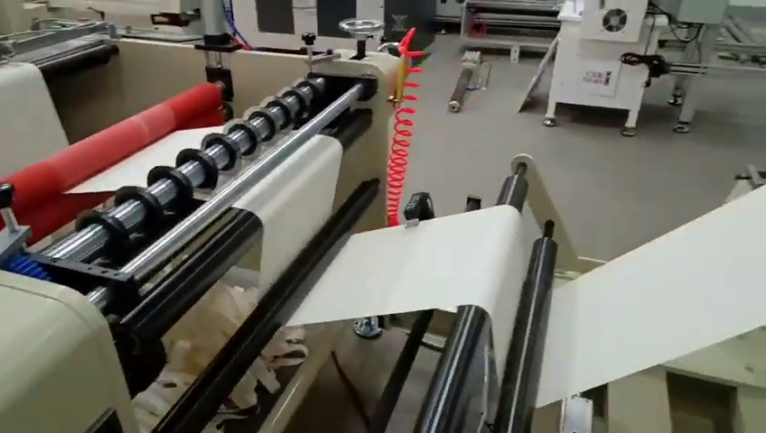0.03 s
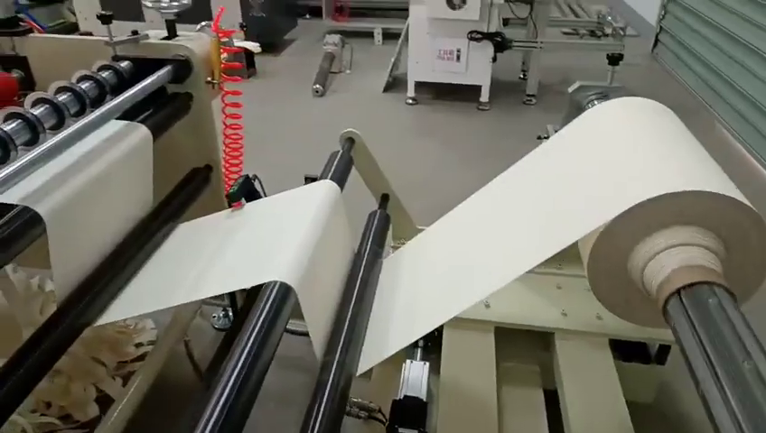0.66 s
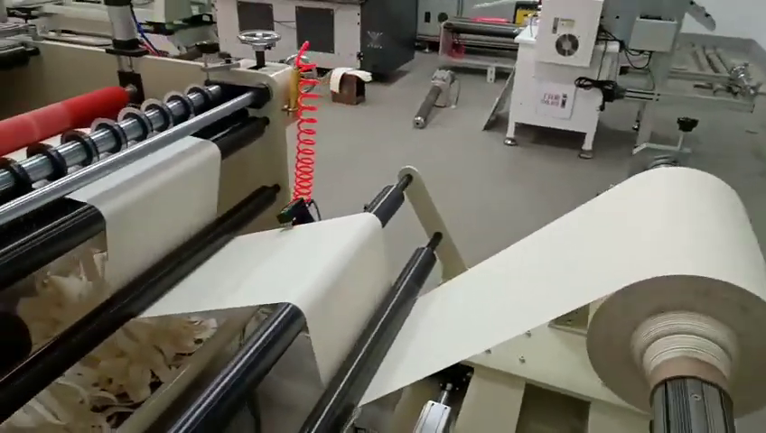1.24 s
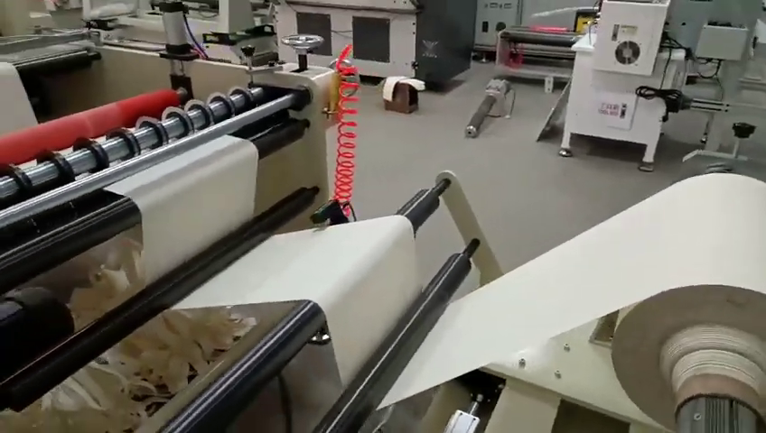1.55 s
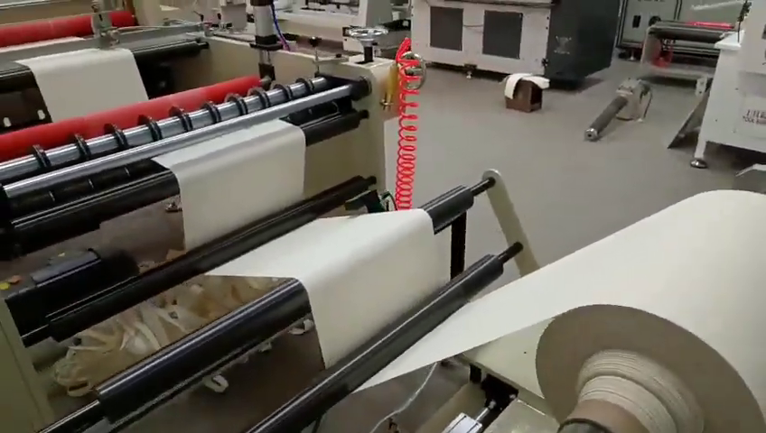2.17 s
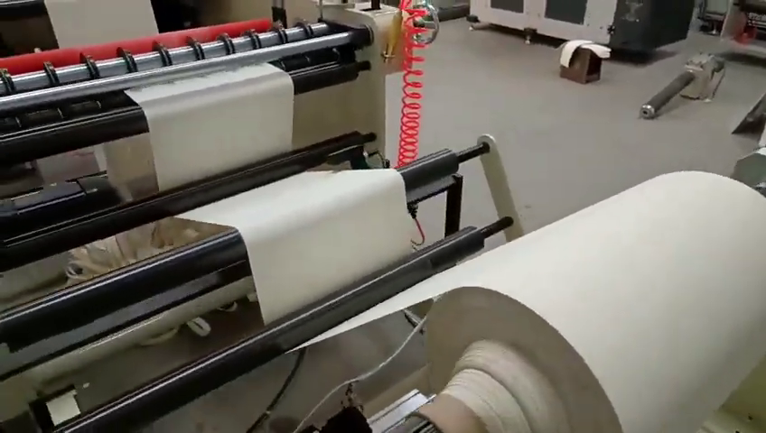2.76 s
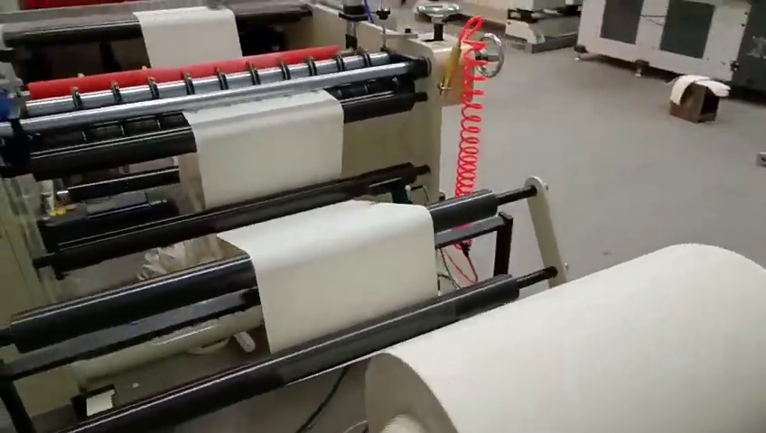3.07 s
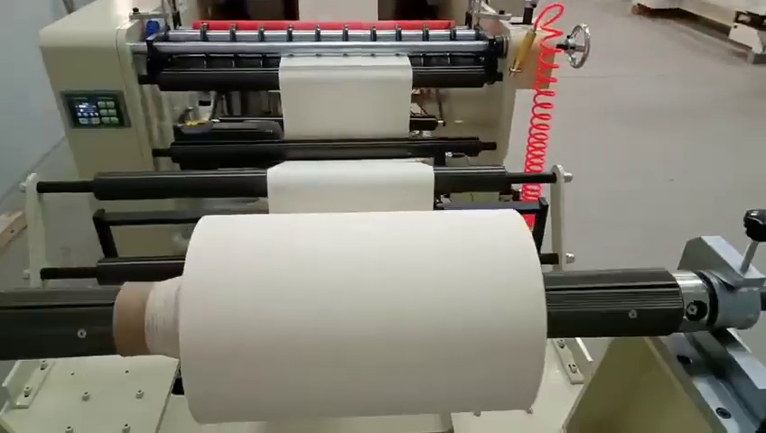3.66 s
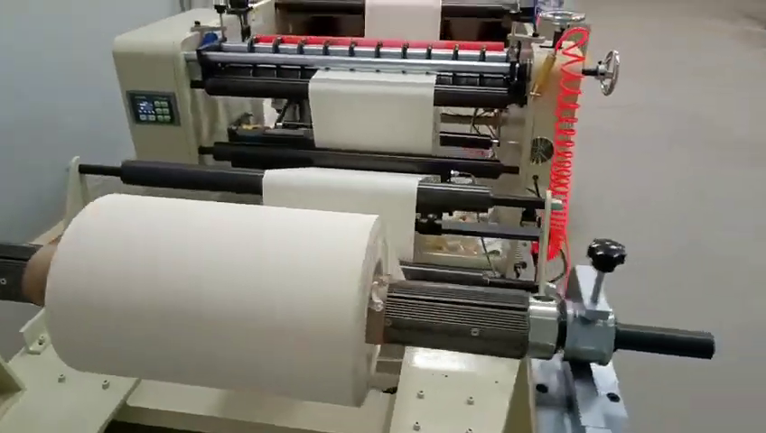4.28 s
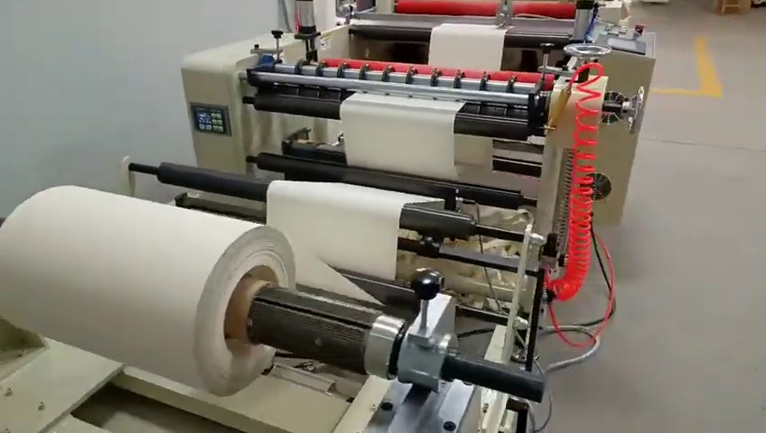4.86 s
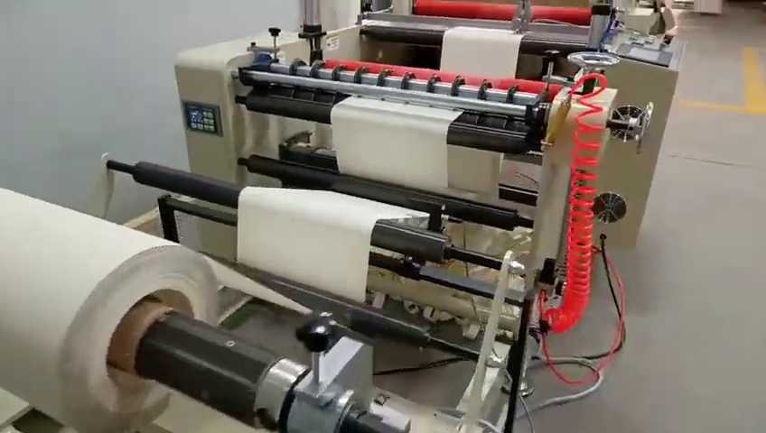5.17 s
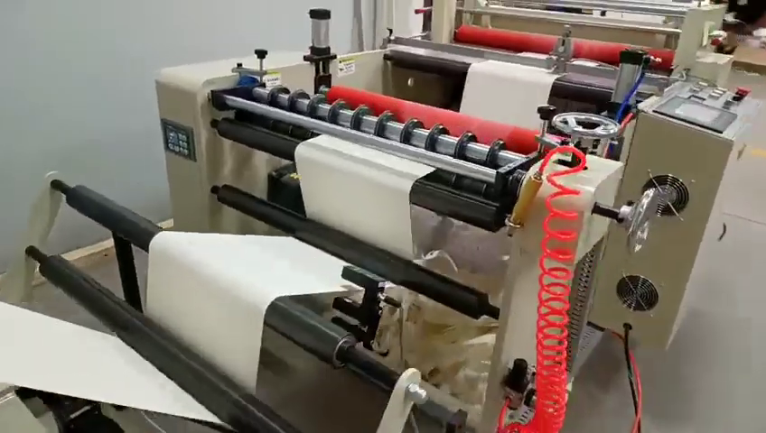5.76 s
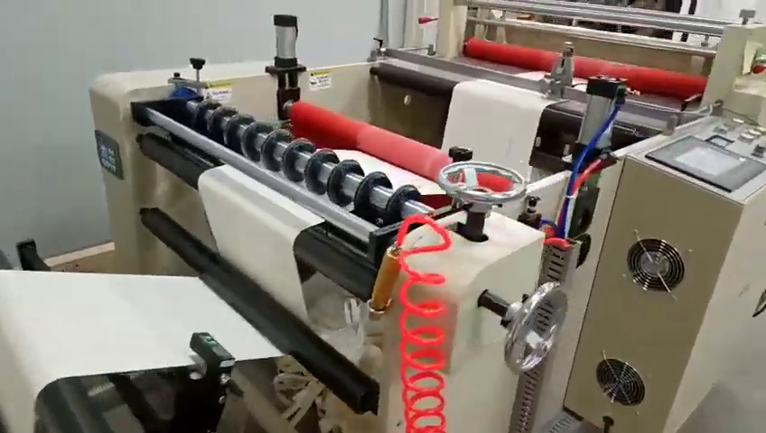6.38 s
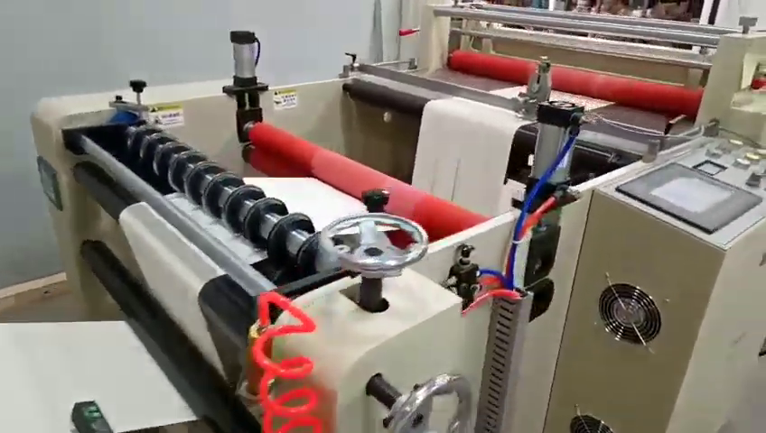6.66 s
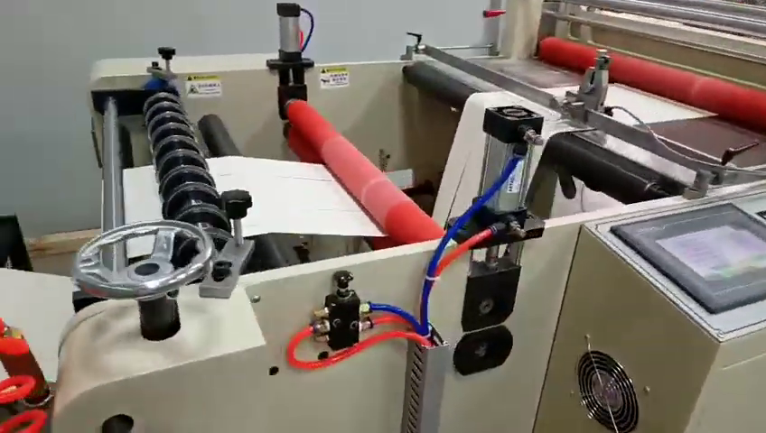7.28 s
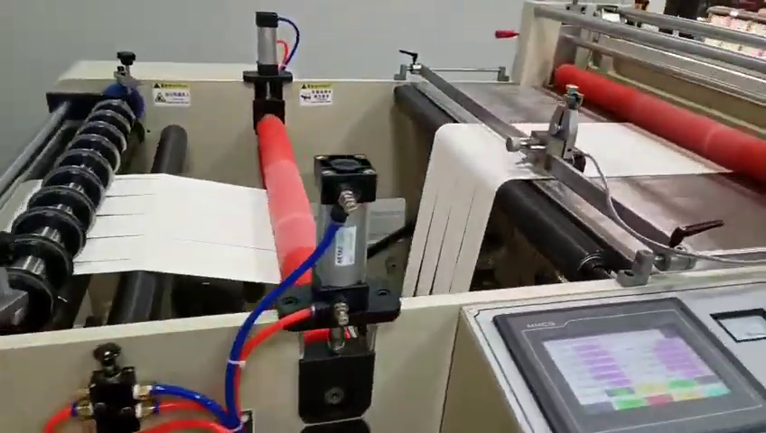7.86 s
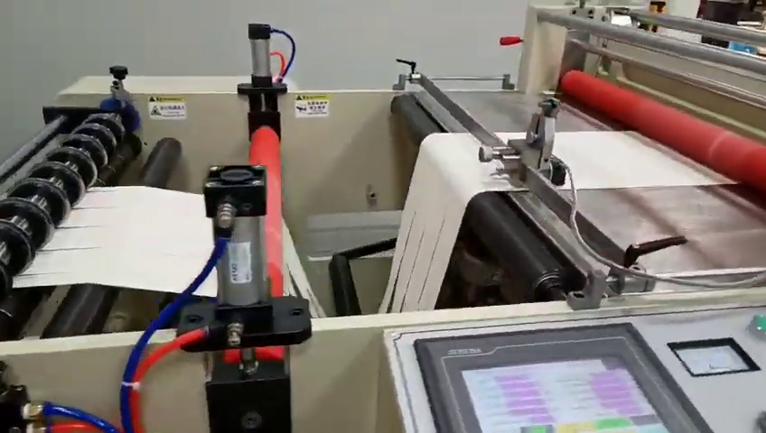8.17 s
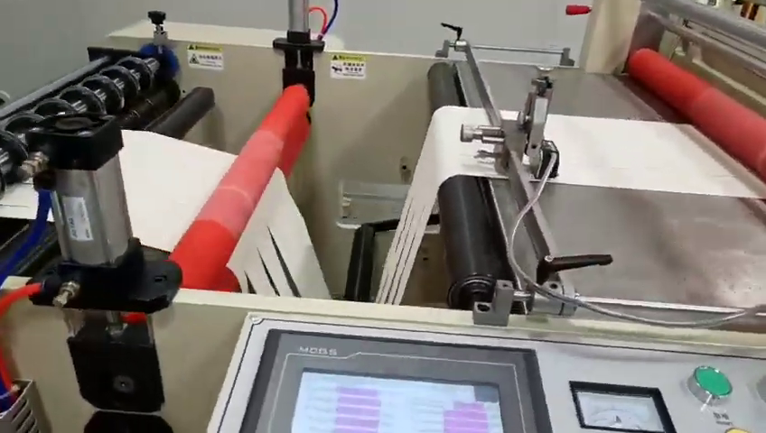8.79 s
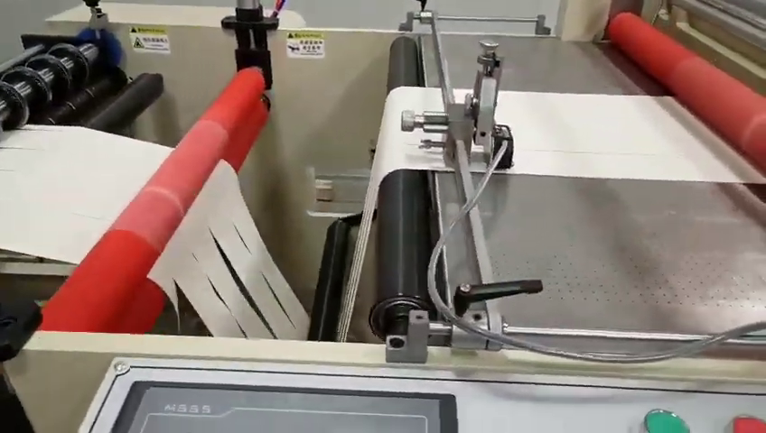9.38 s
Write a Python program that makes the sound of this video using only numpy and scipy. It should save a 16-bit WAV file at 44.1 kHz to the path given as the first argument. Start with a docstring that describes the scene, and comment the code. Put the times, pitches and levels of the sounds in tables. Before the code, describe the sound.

Sharp metallic clunks from a paper machine's knife land a little over a second apart, each ringing briefly in an echoing workshop. Between them the feed swells and stops, with roller rumble, sliding paper hiss, a high motor whistle and a clacking thud. Fan noise and hum fill the gaps. Heard from close by while walking around the machine, it all grows somewhat softer near the end.

```python
"""The knife of a paper sheeting machine clashes down every 1.3 s in a hard-walled workshop.
Before each cut a servo pulls the web forward: rollers rumble and sing, paper hisses over the
guides, the drive whines, then the feed brakes with a thud. Fans and hum fill the pauses.
The drive's whistle and the fans change level as the listener walks round the machine."""
import sys
import numpy as np
from scipy import signal
from scipy.fft import rfft, irfft
from scipy.io import wavfile
from scipy.ndimage import uniform_filter1d

SR = 44100
rng = np.random.default_rng(int(sys.argv[2]) if len(sys.argv) > 2 else 0)


def generate_wav(sig):
    """Save sig (samples, or channels by samples) to the path in sys.argv[1] as 16-bit PCM at SR."""
    pcm = np.round(np.clip(np.atleast_2d(sig).T, -1, 1) * 32767).astype(np.int16)
    wavfile.write(sys.argv[1], SR, pcm)


N = 424683
TIME = np.arange(N) / SR
CYCLE_S, RING_SAMPLES = 1.3, 2 ** 16

# Each row: start in seconds, delay to the snap in seconds, level, bass, treble, hall tail and
# blade ring in dB, tail length factor, two longest-ringing modes in Hz.
CUTS = [(-.03, .015, -23.5, 0, 0, 1, 0, 1, 1480, 1040),
        (1.268, .0135, -23.5, -1, 2.5, 1, 0, 1.15, 2203, 1746),
        (2.565, .023, -22.5, 1, 2, .5, 1, 1.2, 1040, 795),
        (3.865, .024, -22.2, 1, 1, .5, 0, 1.15, 935, 2203),
        (5.169, .024, -20.7, 1, .7, -1.5, 1, 1.05, 1480, 1165),
        (6.468, .0135, -21, 0, -2, -1, 0, .9, 1990, 1235),
        (7.765, .0145, -22, -3, -8.5, -1, 3, .88, 1746, 795),
        (9.065, .0145, -24.5, -6, -10, -1, 3, .9, 1746, 1480)]
# Touch, snap, two rebounds. Each row: time from the snap in seconds, level in dB.
BLADE_CONTACTS = [(-.0095, -15), (0, -10), (.0045, -13.5), (.0165, -15)]
# Each row: frequency in Hz, width in Hz, gain in dB.
KNIFE_MODES = [(795, 20, -1), (935, 24, 1), (1040, 24, -4), (1118, 20, -3), (1165, 20, -12),
               (1235, 24, -10), (1480, 20, 1), (1746, 22, 0), (1990, 24, -13), (2203, 34, -2),
               (2736, 20, -4), (3420, 40, -5)]
FRAME_MODES = [(93.7, 8.8, 2.5), (103.7, 21, -10), (135.5, 12, -0.5), (177.5, 9, 1), (270, 14.8, -1.5),
               (359, 5.3, -13.5)]
# Each row: frequency in Hz, gain in dB.
CLASH_SPECTRUM = [(60, -18.5), (130, -6), (260, 2.5), (400, -3), (680, -3), (900, 3), (1600, 3), (2300, 0),
                  (3200, -6.5), (5500, -11.5), (8000, -17.5), (14000, -21)]
def knife():
    """The blade touches, snaps through and rebounds on its anvil, ringing itself and the frame."""
    long_ring_db, long_t60_s = -15, .7
    out = np.zeros(N)
    s = TIME[:RING_SAMPLES]
    for at, snap_s, db, bass_db, treble_db, hall_db, ring_db, stretch, *long_hz in CUTS:
        shear = chatter(peak_s=snap_s, fade_s=.017, per_s=1500, grit=.55)
        shear /= np.linalg.norm(shear)
        for after_s, contact_db in BLADE_CONTACTS:
            add(shear, amp([contact_db]), snap_s + after_s)
        blow = hall(shear, hall_db, stretch)
        ring = amp(ring_db) * resonate(blow, struck(KNIFE_MODES))
        steel = colour(blow + ring + resonate(blow, FRAME_MODES), CLASH_SPECTRUM)
        tilt = [(900, bass_db), (1500, 0), (1800, 0), (2400, treble_db / 6), (4500, treble_db)]
        add(out, amp(db) * unit(colour(steel, tilt), size=2048), at)
        fade = amp(db + long_ring_db - 60 * s / long_t60_s)
        for hz in long_hz:
            add(out, fade * tone(2 * np.pi * hz * s, scatter=.6, rate_hz=35), at + snap_s)
    return out


# Each row: start in seconds, thud level in dB, clack level in dB, clack treble in dB.
LINKAGE_KNOCKS = [(-.18, -23, -34, 0), (.925, -42, -41, 0), (1.034, -34, -37.5, -6),
                  (1.116, -25.5, -31.5, 3), (2.203, -35, -36.5, 1), (2.268, -38, -41, 0),
                  (2.415, -21, -33, 4), (3.612, -33, -41, 0), (3.716, -25.5, -34.5, 1),
                  (5.015, -25.5, -33, 0), (6.317, -26.5, -29, -4), (7.43, -32, -52, -4),
                  (7.622, -30, -41, -5), (7.68, -36, -40, -5), (8.858, -42, -46, -2),
                  (8.918, -29.5, -34.3, -6), (8.975, -32.5, -43, -2)]
# Each row: frequency in Hz, width in Hz, gain in dB.
LINKAGE_MODES = [(935, 30, 0), (1130, 40, 1), (1290, 40, 0), (1700, 45, 0), (1930, 70, 0), (2580, 90, -1),
                 (2736, 25, -1), (3360, 35, -1)]
# Each row: frequency in Hz, gain in dB.
THUD_SPECTRUM = [(40, -53), (70, -10), (90, -1), (140, 1.5), (190, -7.5), (300, -1), (480, -9), (650, -22),
                 (900, -44.5)]
CLACK_SPECTRUM = [(100, -4.5), (500, 8), (1100, 5), (2000, 2), (3200, -3), (4200, -6), (7000, -42),
                  (14000, -51)]
def linkage():
    """The feed linkage clacks and the heavy frame shudders, hardest on braking."""
    out = np.zeros(N)
    push = signal.unit_impulse(RING_SAMPLES, int(.01187 * SR))
    boom = unit(resonate(colour(push, THUD_SPECTRUM), FRAME_MODES), size=4096)
    for at, thud_db, clack_db, treble_db in LINKAGE_KNOCKS:
        jolt = chatter(peak_s=.032, fade_s=.05, per_s=280, grit=1)
        jolt = colour(hall(jolt, wet_db=-2.5), THUD_SPECTRUM)
        shudder = unit(jolt + amp(2.5) * resonate(jolt, FRAME_MODES), size=4096)
        thud = amp(-3) * shudder + amp(-11.5) * boom
        clack = chatter(peak_s=.009, fade_s=.022, per_s=400, grit=1.2)
        clack = colour(hall(clack, wet_db=-1), CLACK_SPECTRUM)
        clack += 2 * resonate(clack, struck(LINKAGE_MODES))
        clack = colour(clack, [(1200, 0), (2800, treble_db)])
        add(out, amp(thud_db) * thud + amp(clack_db) * unit(clack, size=2048), at)
    return out


# Each row: start in seconds, rumble in dB, its growth in dB/s, its steepness factor, drone, hiss,
# fizz and sheen in dB, growth of fizz and sheen in dB/s, howl and rattle in dB.
PULLS = [(-.89, -35.5, 0, 1, -39, -42, -51, -58, 0, -48, -49),
         (.41, -32.5, -7, 1, -38, -39, -45.5, -47, 0, -37.5, -50),
         (1.708, -31, -3, .9, -38, -40.3, -45, -48, -3, -38, -48),
         (3.007, -31.5, 0, .9, -36.5, -41.3, -49.5, -58.5, -8, -50, -46),
         (4.309, -32, -2, 1.1, -35.5, -42, -49, -55, -2, -52, -46.5),
         (5.608, -32, -1, 1.3, -37.5, -41.7, -45.3, -52.5, -17, -52, -49),
         (6.909, -38, -8, 1.7, -42, -47.5, -53.5, -61, -3, -54, -59),
         (8.205, -36, -10, 1.7, -44, -49, -45.5, -51.5, -11, -51, -57),
         (9.507, -38, 0, 1.7, -44, -48, -46, -54, 0, -52, -58)]
# Each row: frequency in Hz, width in Hz, gain in dB.
ROLLER_MODES = [(209, 88, -4.5), (269.5, 30, -1), (335.6, 8, 8), (376.5, 10, 2), (415, 80, 1),
                (528, 13, -1)]
HOWL_MODES = [(556, 45, -1), (602, 36, 0)]
# Each row: frequency in Hz, gain in dB.
RUMBLE_SPECTRUM = [(100, -23), (180, -4.5), (300, -2.5), (450, -1), (620, -5), (760, -11.5), (1000, -23),
                   (2000, -28.5), (3500, -30), (8000, -59)]
RATTLE_SPECTRUM = [(400, -22), (900, -2), (1500, 0), (2300, -1), (3200, -11), (7000, -25)]
HISS_SPECTRUM = [(600, -14), (1000, -1.5), (2200, -.5), (3200, -6.3), (4250, 6), (4750, 3.5), (5600, 6),
                 (7500, -2.5), (10000, -14), (14000, -22)]
FIZZ_SPECTRUM = [(4500, -28), (6600, 1), (8200, 1.5), (9700, 1), (10700, -6), (14000, -19)]
SHEEN_SPECTRUM = [(7000, -30), (10000, -1), (11000, -2), (12000, -1.5), (14000, -2)]
def feed():
    """Rollers tumble on their bearings, howl and shake linkage and frame; the web slides over guides."""
    (_, rumble_db, rumble_db_per_s, steepness, drone_db, hiss_db,
     fizz_db, sheen_db, fizz_db_per_s, howl_db, rattle_db) = np.transpose(PULLS)
    knocks = colour(unit(grains(per_s=1500, spread_db=2.5)) + .64 * noise(), RUMBLE_SPECTRUM)
    rumble = unit(knocks + amp(2) * resonate(knocks, ROLLER_MODES)) * amp(.9 * walk(22))
    out = rumble * swell(rumble_db, 2.4 * steepness, lag_s=-.035, rest_db=-26, db_per_s=rumble_db_per_s)

    howl = unit(resonate(resonate(grains(per_s=600, spread_db=2), HOWL_MODES), HOWL_MODES))
    out += howl * swell(howl_db, power=2, lag_s=-.11, rest_db=-30)

    ticks = unit(grains(per_s=260, spread_db=1.5)) + .5 * noise()
    rattle = unit(colour(ticks + 2 * resonate(ticks, LINKAGE_MODES), RATTLE_SPECTRUM))
    out += rattle * amp(1.5 * walk(14)) * swell(rattle_db, power=3, lag_s=-.04, rest_db=-25)

    shake = colour(noise(), [(40, -13), (80, 1), (150, 12), (260, -17.5), (900, -55)])
    drone = unit(resonate(shake, FRAME_MODES))
    out += drone * swell(drone_db, power=2.3, lag_s=.07, rest_db=-25)

    slide = amp(1.3 * walk(35))
    hiss = unit(colour(noise() + .5 * unit(grains(per_s=1400, spread_db=3.5)), HISS_SPECTRUM))
    out += hiss * slide * swell(hiss_db, power=1.5, lag_s=-.06, rest_db=-19)
    for spectrum, db in ((FIZZ_SPECTRUM, fizz_db), (SHEEN_SPECTRUM, sheen_db)):
        out += rasp(spectrum) * swell(db, power=2.1, lag_s=-.13, rest_db=-14, db_per_s=fizz_db_per_s)
    return out


def rasp(spectrum):
    """The sliding web catches and slips."""
    friction = noise() + .42 * unit(grains(per_s=900, spread_db=.5))
    return unit(colour(friction, spectrum) * amp(1.7 * walk(160)))


def speed(since_s):
    """Web speed, 0 to 1: one arch from rest to rest."""
    return np.sin(np.pi * np.clip(since_s / CYCLE_S, 0, 1))


def swell(levels_db, power, lag_s, rest_db, db_per_s=0):
    """Gain that follows a power of web speed in each pull and lingers faintly between."""
    starts_s = np.array(PULLS)[:, 0] + lag_s
    gain = amp(rest_db + np.interp(TIME, starts_s + CYCLE_S / 2, levels_db))
    s = TIME[:int(CYCLE_S * SR)]
    for at, db, growth, exponent in np.broadcast(starts_s, levels_db, db_per_s, power):
        arch = (1 - amp(rest_db)) * speed(s) ** exponent
        add(gain, arch * amp(db + growth * (s - CYCLE_S / 2)), min(at, TIME[-1]))
    return gain


# Each row: start in seconds, length in seconds, pitch in Hz, level in dB.
SINGS = [(.53, .36, 598, -45), (.68, .12, 363, -39), (.88, .13, 600, -35), (.95, .14, 565, -36),
         (.9, .1, 363, -35), (1.12, .13, 135, -35), (1.88, .16, 570, -44), (1.98, .1, 430, -38),
         (2.2, .3, 601, -34), (3.42, .14, 433, -35.5), (3.55, .2, 93, -40), (4.5, .16, 285, -43),
         (4.73, .16, 339, -34), (5.98, .2, 335, -37), (6.08, .22, 177, -42), (7.29, .12, 340, -35),
         (7.4, .2, 175, -39), (7.3, .1, 440, -37), (8.52, .14, 462, -36), (8.58, .18, 345, -37.5)]
def singing():
    """Under tension a roller or the frame briefly rings and rattles at one resonance."""
    out = np.zeros(N)
    for at, length_s, hz, db in SINGS:
        on = gate(at, length_s, edge_s=.07)
        live = on > 0
        phase = 2 * np.pi * hz * TIME[live]
        ring = tone(phase, scatter=.5, rate_hz=45) + .7 * tone(phase, scatter=3, rate_hz=130)
        out[live] += amp(db) * on[live] * unit(ring)
    return out


# One curve per pull. Each row: time in seconds, relative levels of lower and upper tone in dB.
WHINE_CURVES = [
    [(0.8, -51, -50), (0.88, -41, -43), (0.942, -45, -44), (1.088, -44, -42), (1.122, -41, -40),
     (1.202, -42, -40), (1.255, -47, -46)],
    [(2.07, -53, -53), (2.09, -45, -46), (2.31, -44, -45), (2.33, -40, -40), (2.416, -44, -44),
     (2.51, -37, -38), (2.555, -49, -49)],
    [(3.37, -53, -52), (3.394, -43, -45), (3.466, -48, -48), (3.528, -41, -43), (3.634, -45, -43),
     (3.674, -40, -41), (3.86, -46, -46)],
    [(4.68, -58, -57), (4.7, -49, -51), (4.958, -43, -42), (5.026, -50, -49), (5.054, -46, -44),
     (5.144, -47, -47), (5.16, -52, -53)],
    [(5.97, -51, -50), (5.99, -46, -44), (6.136, -48, -46), (6.214, -38, -41), (6.288, -45, -46),
     (6.328, -41, -42), (6.46, -47, -47)],
    [(7.29, -56, -56), (7.364, -46, -46), (7.484, -60, -60), (7.51, -52, -52), (7.596, -59, -58),
     (7.668, -46, -47), (7.73, -59, -58)],
    [(8.59, -56, -56), (8.636, -43, -44), (8.718, -44, -43), (8.924, -58, -58), (8.954, -53, -55),
     (8.984, -62, -61), (9.04, -51, -53)],
]
def drive_whine(switching, sideband):
    """Under load two beating tones flank the switching rate. Returns sound and load."""
    lower, upper = (
        amp(1.2) * unit(tone(phase, scatter=.45, rate_hz=45) + .5 * tone(phase, scatter=3, rate_hz=260))
        for phase in (switching - sideband, switching + sideband))
    whine, load = np.zeros(N), np.zeros(N)
    for curve in WHINE_CURVES:
        start_s, end_s = curve[0][0], curve[-1][0]
        on = gate(start_s, end_s - start_s, edge_s=.03)
        lower_db, upper_db = curves(curve)
        whine += on * (amp(lower_db) * lower + amp(upper_db) * upper)
        load += on
    return whine, load


# Motor housing resonances. Each row: frequency in Hz, width in Hz, boost in dB.
HOUSING_MODES = [(5480, 300, 6), (6800, 150, 6)]
def drive(near_db):
    """The inverter's switching rate steps up with speed; it whines, and whistles at twice that rate."""
    rest_hz, rise_hz, step_hz, top_hz, sideband_hz = 2510, 2670, 100, 4000, 66
    since_s = (TIME - PULLS[1][0]) % CYCLE_S
    pace, braking = speed(since_s), since_s > CYCLE_S / 2
    switch_hz = np.minimum(step_hz * np.round((rest_hz + rise_hz * pace) / step_hz), top_hz)
    climb = (switch_hz - rest_hz) / (top_hz - rest_hz)
    switching, sideband = phase_of(switch_hz), phase_of(sideband_hz * pace)
    whine, load = drive_whine(switching, sideband)

    housing_db = sum(db * np.exp(-(2 * (2 * switch_hz - hz) / width) ** 2)
                     for hz, width, db in HOUSING_MODES)
    whistle = tone(2 * switching - sideband * 2 / 3, scatter=.3, rate_hz=60)
    whistle += .5 * tone(2 * switching + sideband * 2 / 3, scatter=.5, rate_hz=60)
    whistle *= amp(housing_db - 7.5 * load + 2.5 * walk(22))
    octave = amp(-9) * tone(4 * switching, scatter=.3, rate_hz=60)
    first = amp(-11) * tone(switching - sideband, scatter=2, rate_hz=150)
    third = amp(-19) * tone(3 * switching, scatter=2, rate_hz=150)
    whistle += octave * (climb < .5) + climb ** 2 * (first + third)
    whistle *= amp(near_db - 65 + 9.5 * climb ** 2 - 5.5 * braking * (1 - load))
    return whine + reflected(whistle, share=.35, fade_s=.055)


# Each row: start in seconds, length in seconds, pitch in Hz, glide in Hz/s, level in dB.
SQUEAKS = [(1.74, .45, 5090, -60, -52)]
def squeak():
    """Paper slips on a guide: a thin, rough whistle that sags."""
    out = np.zeros(N)
    for at, length_s, hz, hz_per_s, db in SQUEAKS:
        phase = phase_of(hz + hz_per_s * np.clip(TIME - at, 0, length_s))
        out += amp(db) * gate(at, length_s, edge_s=.08) * tone(phase, scatter=1.5, rate_hz=130)
    return out


# Each row: frequency in Hz, level in dB.
WASH_SPECTRUM = [(25, -31), (60, -21), (100, -1.5), (200, 2), (320, -6), (550, -7.5), (1000, -4.7),
                 (2100, -8.2), (3200, -12), (4500, -15), (5400, -11), (7500, -23), (9200, -21),
                 (14000, -35)]
HUM_TONES = [(193.8, -60), (236.9, -60), (715, -66), (4549, -73), (8900, -72), (9000, -73), (9103, -71)]
# Cabinet fan, loudest at its grille. Each row: time in seconds, level in dB.
FAN_LEVELS = [(0, -66), (3.1, -61), (4.4, -55), (5.45, -54), (5.7, -48), (5.9, -56), (7, -59), (9.6, -62)]
def fans(wash_db):
    """Fluttering air wash, the cabinet fan's blade tone and the hum of fans and electronics."""
    blade_hz, flutter_db = 967, 3
    air = unit(colour(noise(), WASH_SPECTRUM)) * amp(wash_db + 1.3 * walk(5.1))
    bins = signal.stft(air, SR, nperseg=512)[2]
    flutter = uniform_filter1d(noise(bins.shape), size=3, axis=0)
    flutter = unit(uniform_filter1d(flutter, size=9, axis=1))
    wash = signal.istft(bins * amp(flutter_db * (flutter - 1 / 3)), SR)[1][:N]
    blades = amp(curves(FAN_LEVELS)[0]) * tone(2 * np.pi * blade_hz * TIME, scatter=.9, rate_hz=35)
    hum = sum(amp(db) * tone(2 * np.pi * hz * TIME, scatter=1.3, rate_hz=25) for hz, db in HUM_TONES)
    return wash + blades + hum


# Each row: frequency in Hz, unstretched time to fall 60 dB in seconds.
HALL_DECAY = [(100, 1.06), (400, 0.95), (1000, .8), (2200, 0.81), (5000, 0.95), (12000, 0.46)]
def hall(blow, wet_db, stretch=1):
    """A blow at unit energy plus dense echoes that build and die away, top treble first."""
    build_s = .015
    hz, s, bins = signal.stft(noise(RING_SAMPLES), SR, nperseg=512)
    t60_s = stretch * on_log_axis(HALL_DECAY, hz)[:, None]
    tail = signal.istft(bins * amp(-60 * (s / t60_s) ** 1.15), SR)[1]
    tail *= 1 - np.exp(-TIME[:RING_SAMPLES] / build_s)
    return blow / np.linalg.norm(blow) + amp(wet_db) * tail / np.linalg.norm(tail)


def reflected(x, share, fade_s):
    """Reflections from cabinet and walls trail a tone and roughen it."""
    paths = noise(8192) * np.exp(-TIME[:8192] / fade_s)
    echoes = signal.fftconvolve(x, paths / np.linalg.norm(paths))[:N]
    return np.sqrt(1 - share) * x + np.sqrt(share) * echoes


def chatter(peak_s, fade_s, per_s, grit):
    """Metal on metal: contacts over a dense scrape, building to a peak and fading."""
    s = TIME[:RING_SAMPLES]
    contacts = unit((rng.random(RING_SAMPLES) < per_s / SR) * np.sign(noise(RING_SAMPLES)))
    force = np.minimum(.33 + s / peak_s, 1) * np.exp(-np.maximum(s - peak_s, 0) / fade_s)
    return force * (grit * contacts + noise(RING_SAMPLES))


def struck(modes, spread_db=2):
    """Each blow stirs the modes a little differently."""
    return [(hz, width, db + spread_db * rng.standard_normal()) for hz, width, db in modes]


def resonate(x, modes):
    """Bank of two-pole resonances."""
    return sum(amp(db) * signal.lfilter(*signal.iirpeak(hz, hz / width, SR), x)
               for hz, width, db in modes)


def tone(phase, scatter, rate_hz):
    """Tone with rms near 1, fluttering with shifting reflections."""
    sine = (1 + scatter * walk(rate_hz, len(phase))) * np.sin(phase)
    cosine = scatter * walk(rate_hz, len(phase)) * np.cos(phase)
    return (sine + cosine) / np.sqrt(.5 + scatter ** 2)


def grains(per_s, spread_db):
    """Random tiny impacts of uneven size."""
    return (rng.random(N) < per_s / SR) * noise() * amp(spread_db * noise())


def colour(x, spectrum):
    """Minimum-phase filter through (Hz, dB) points."""
    size = 4096
    gain = amp(on_log_axis(spectrum, np.fft.rfftfreq(size, 1 / SR)))
    cepstrum = irfft(np.log(gain))
    cepstrum[1:size // 2] *= 2
    cepstrum[size // 2 + 1:] = 0
    return signal.oaconvolve(x, irfft(np.exp(rfft(cepstrum))))[:len(x)]


def on_log_axis(points, hz):
    """Interpolate over log frequency."""
    f, value = np.transpose(points)
    return np.interp(np.log(hz + 1), np.log(f), value)


def curves(rows):
    """Interpolate each column over time."""
    s, *values = np.transpose(rows)
    return [np.interp(TIME, s, v) for v in values]


def walk(rate_hz, size=N):
    """Random wander with spread near 1."""
    return np.interp(TIME[:size] * rate_hz, np.arange(2048), noise(2048)) * np.sqrt(1.5)


def gate(at, length_s, edge_s):
    """On for a while, with soft edges."""
    return np.clip(np.minimum(TIME - at, at + length_s - TIME) / edge_s + .5, 0, 1)


def add(out, x, at):
    """Mix x in from at seconds."""
    start = int(at * SR)
    x = x[max(-start, 0):len(out) - start]
    out[max(start, 0):max(start, 0) + len(x)] += x


def phase_of(hz):
    """Running phase in radians."""
    return 2 * np.pi * np.cumsum(hz) / SR


def amp(db):
    """Decibels to gain."""
    return 10 ** (np.asarray(db) / 20)


def unit(x, size=None):
    """Scale to rms 1 over the first size samples."""
    return x / np.sqrt(np.mean(x[:size] ** 2))


def noise(size=N):
    """White noise."""
    return rng.standard_normal(size)


# Each row: time in seconds, drive whistle gain in dB, fan wash level in dB.
LISTENER_PATH = [(0, 3, -49), (1.8, 6.5, -47.5), (3.1, 4.5, -44.5), (4.4, 3, -44.8), (5.7, 5, -45),
                 (7, -4, -49.5), (8.3, -5, -49.3), (9.6, -4, -50)]
def scene():
    """All sources at the listener, the same in both channels."""
    near_db, wash_db = curves(LISTENER_PATH)
    mix = knife() + linkage() + feed() + singing() + squeak() + drive(near_db) + fans(wash_db)
    return np.tile(mix, (2, 1))


def record(dry):
    """Steep low-pass on the top treble."""
    top_hz = 13950
    return signal.sosfilt(signal.ellip(10, .2, 80, top_hz, fs=SR, output="sos"), dry)


dry = scene()
out = record(dry)
generate_wav(out)
```